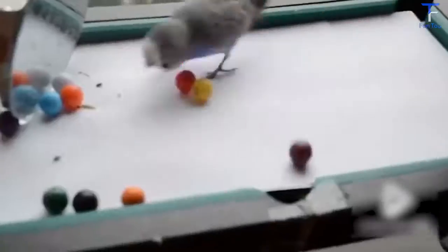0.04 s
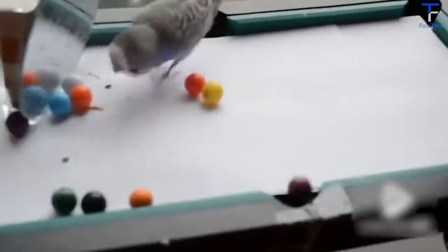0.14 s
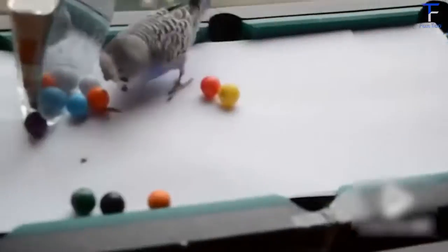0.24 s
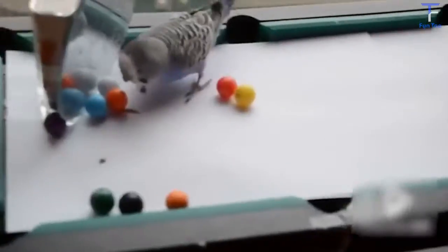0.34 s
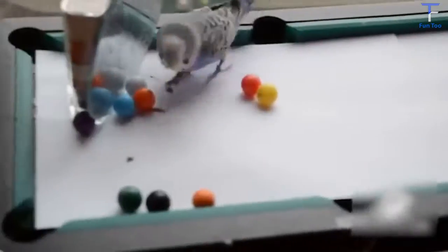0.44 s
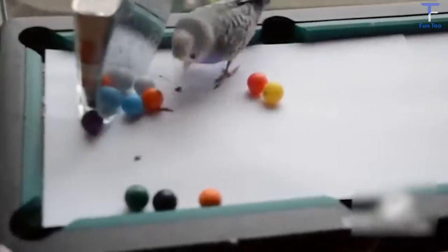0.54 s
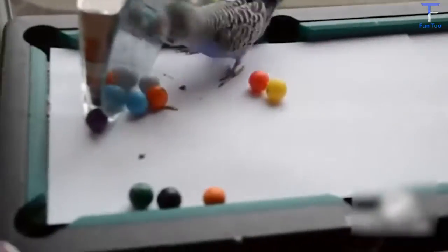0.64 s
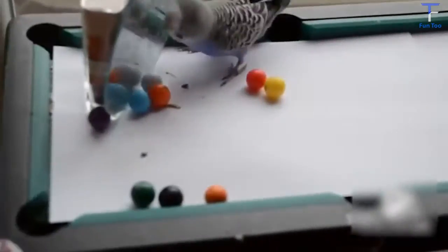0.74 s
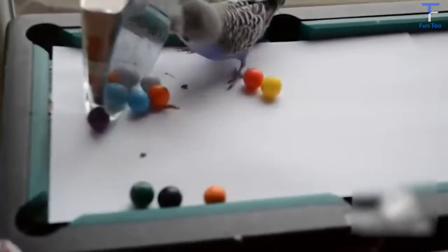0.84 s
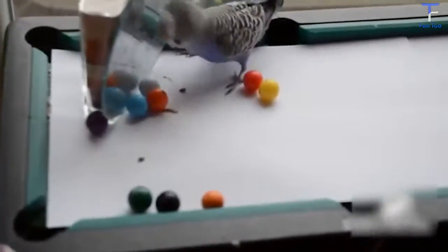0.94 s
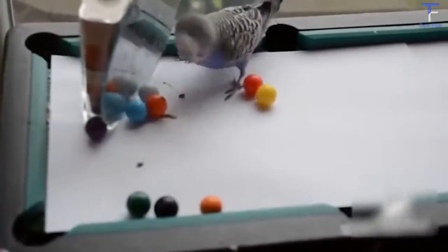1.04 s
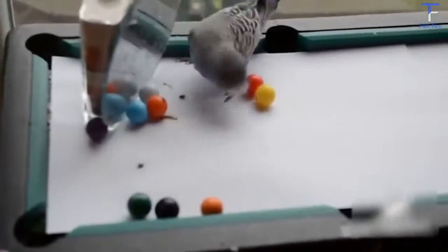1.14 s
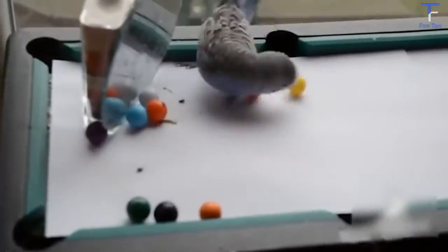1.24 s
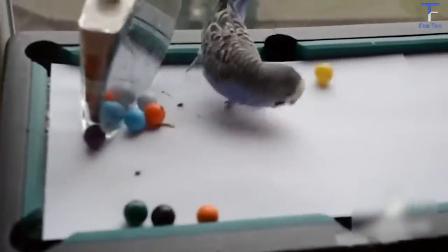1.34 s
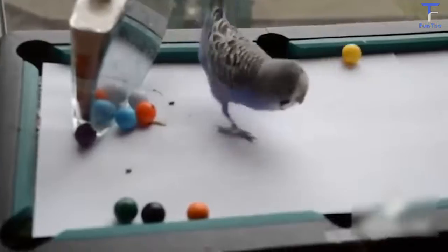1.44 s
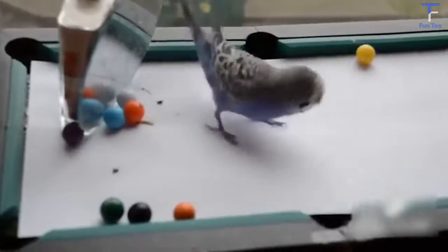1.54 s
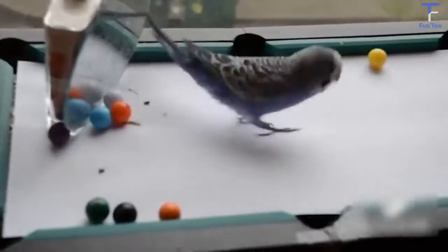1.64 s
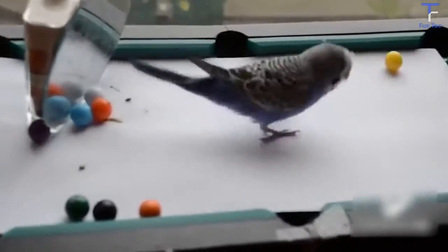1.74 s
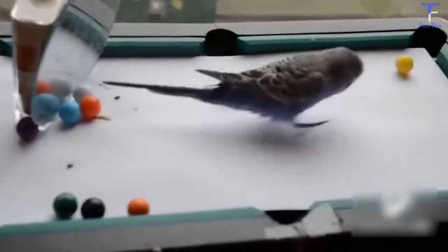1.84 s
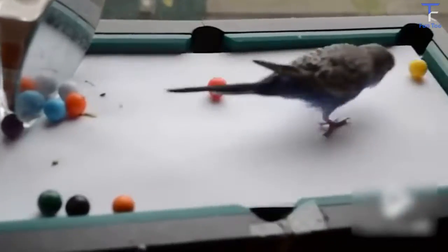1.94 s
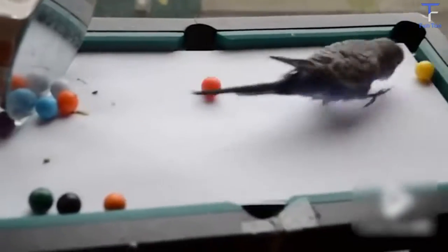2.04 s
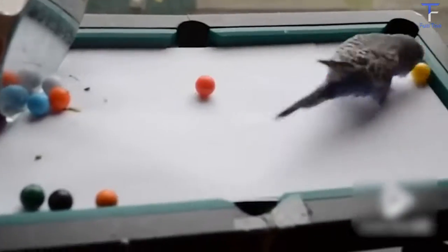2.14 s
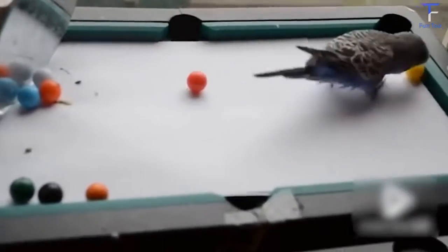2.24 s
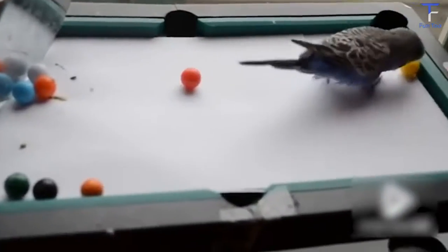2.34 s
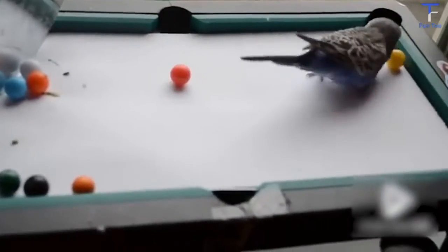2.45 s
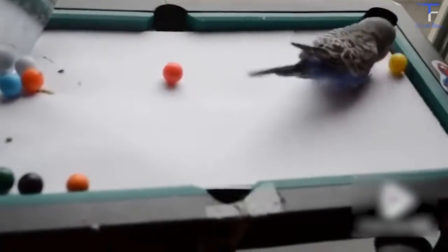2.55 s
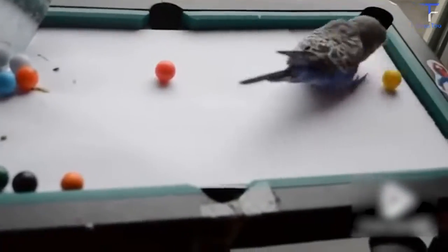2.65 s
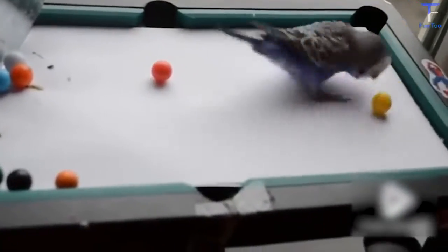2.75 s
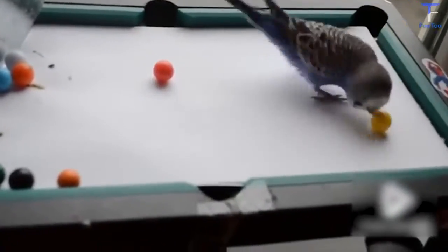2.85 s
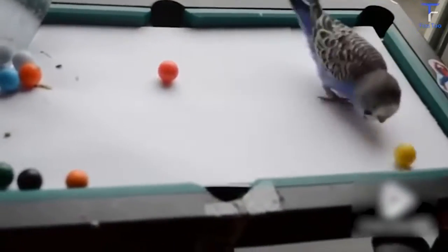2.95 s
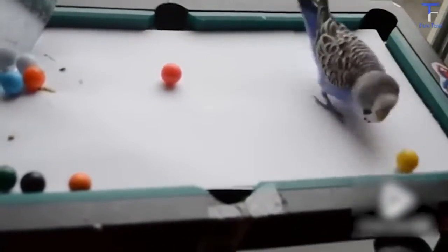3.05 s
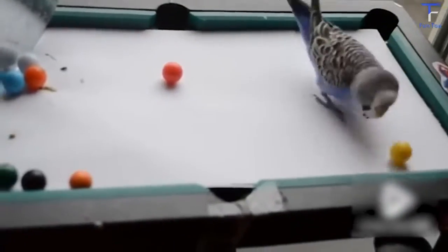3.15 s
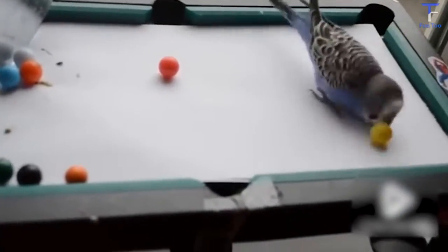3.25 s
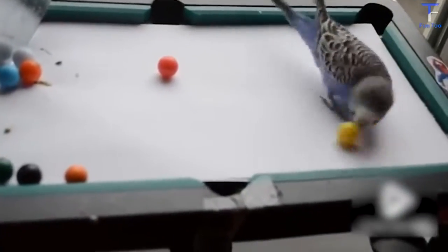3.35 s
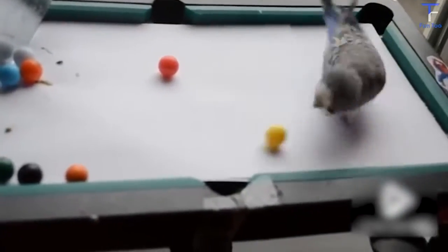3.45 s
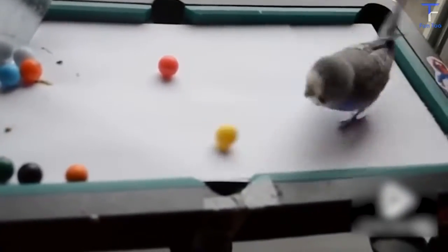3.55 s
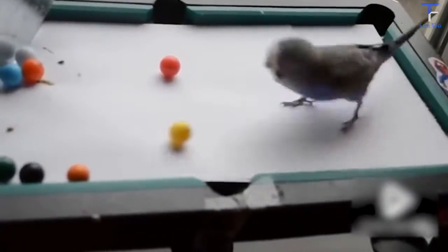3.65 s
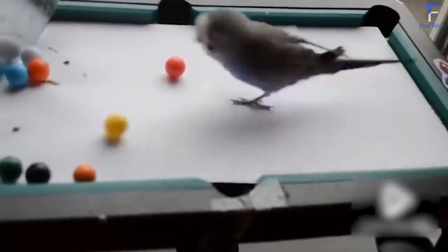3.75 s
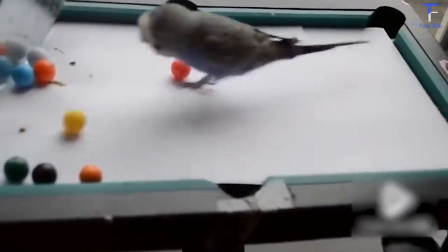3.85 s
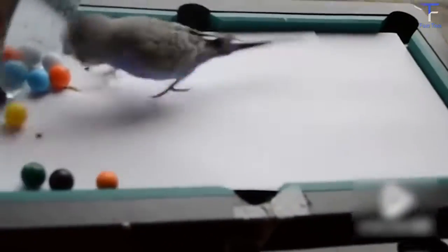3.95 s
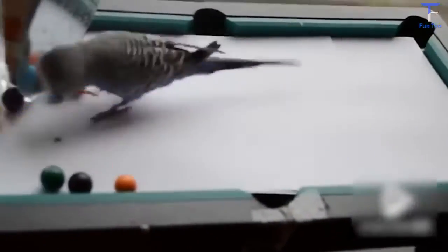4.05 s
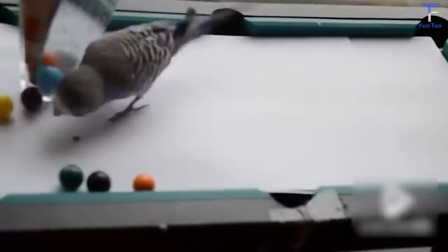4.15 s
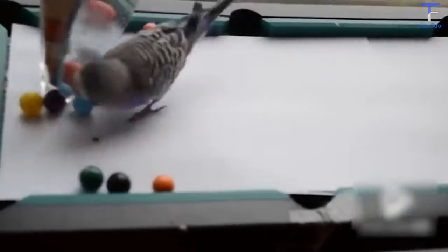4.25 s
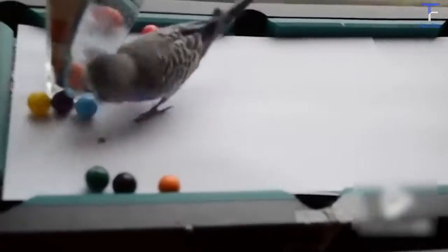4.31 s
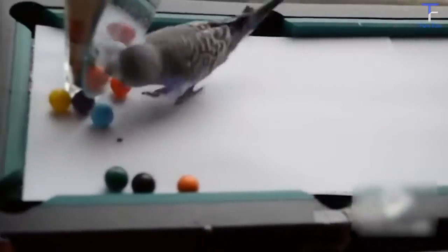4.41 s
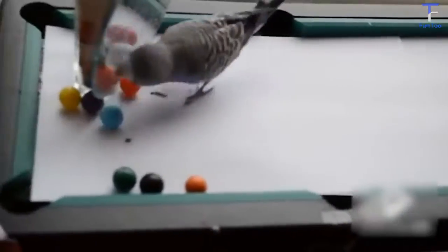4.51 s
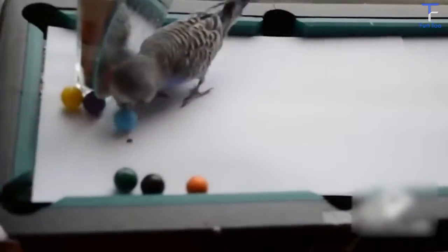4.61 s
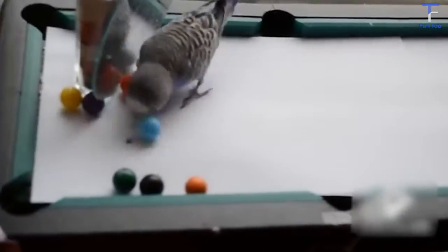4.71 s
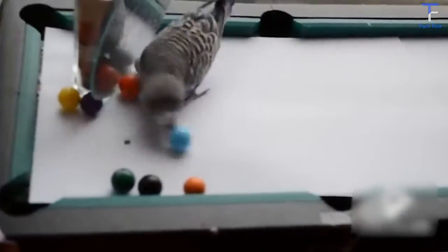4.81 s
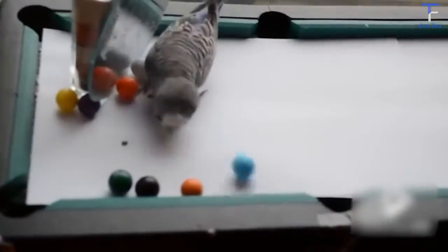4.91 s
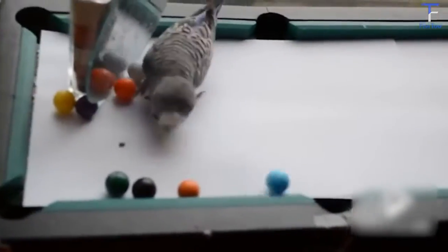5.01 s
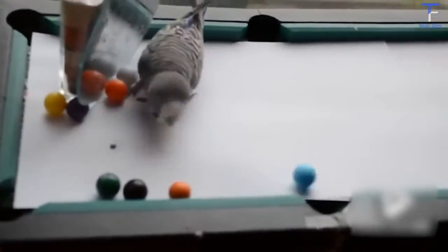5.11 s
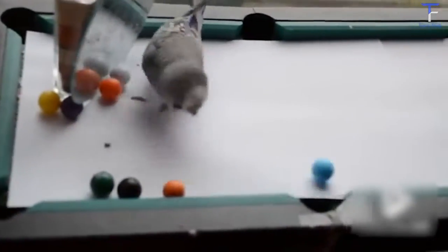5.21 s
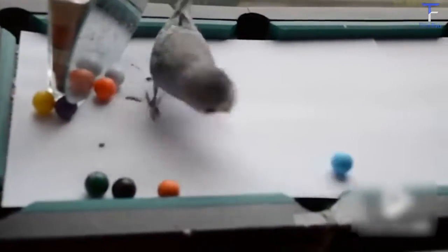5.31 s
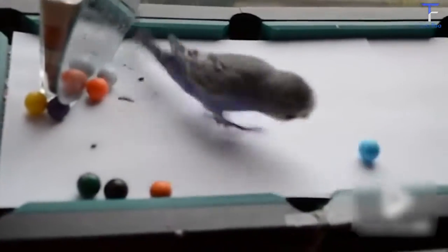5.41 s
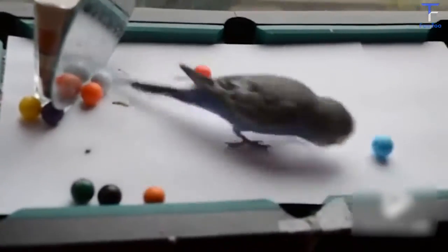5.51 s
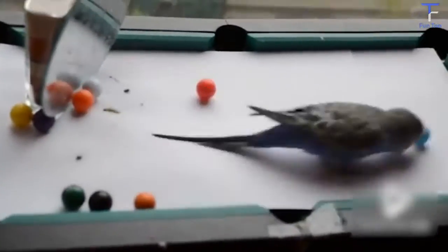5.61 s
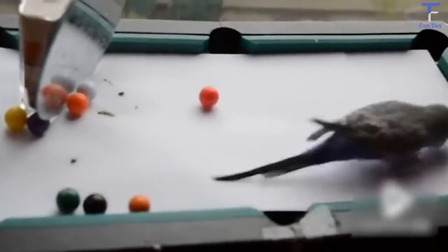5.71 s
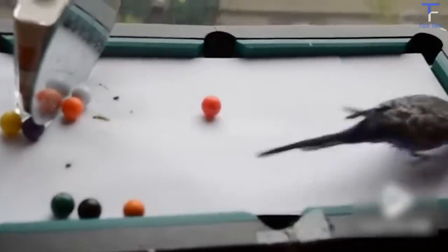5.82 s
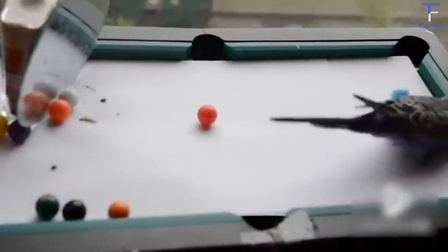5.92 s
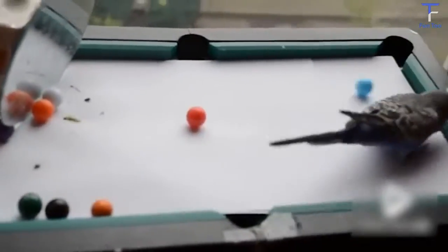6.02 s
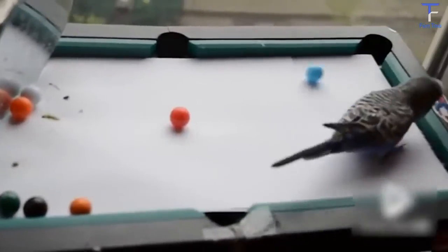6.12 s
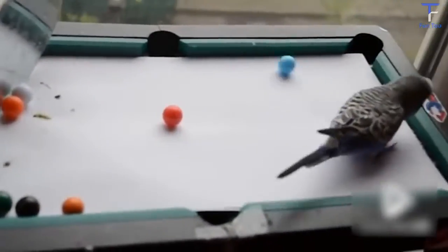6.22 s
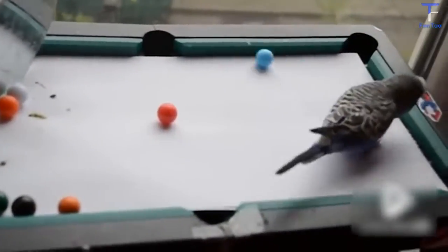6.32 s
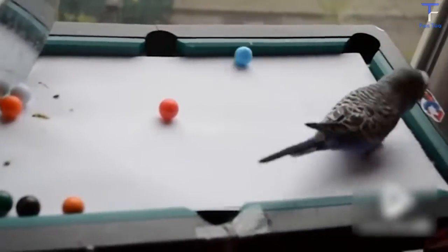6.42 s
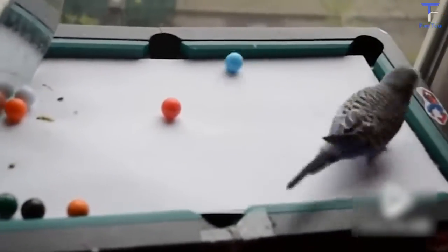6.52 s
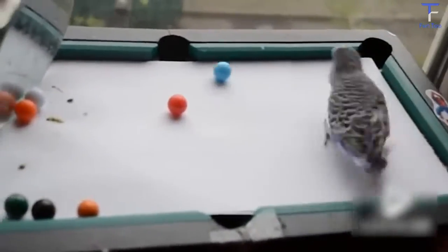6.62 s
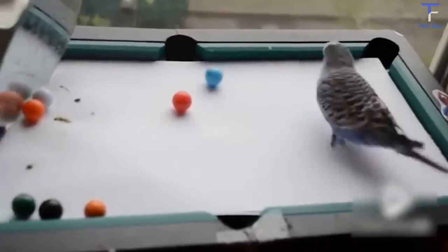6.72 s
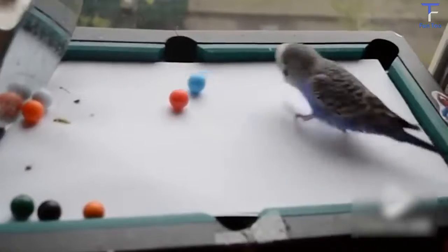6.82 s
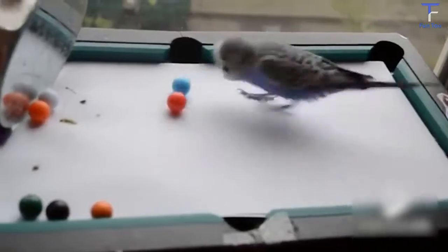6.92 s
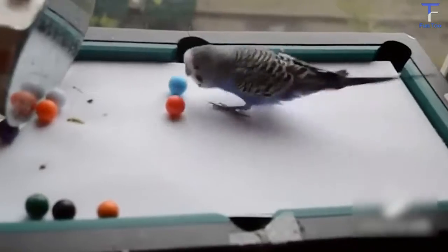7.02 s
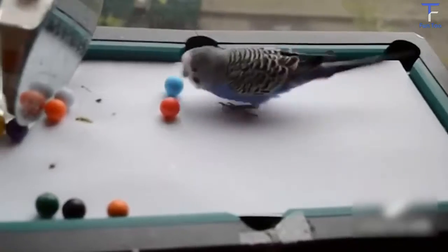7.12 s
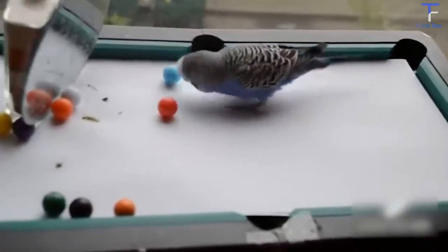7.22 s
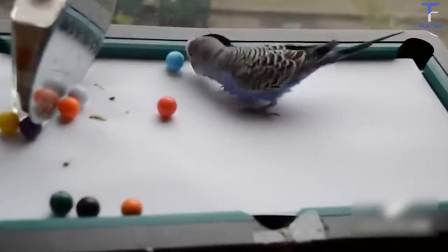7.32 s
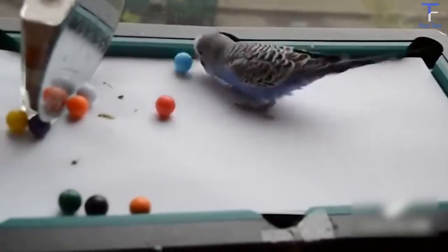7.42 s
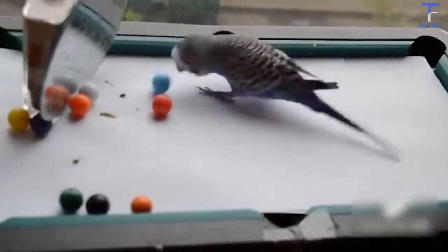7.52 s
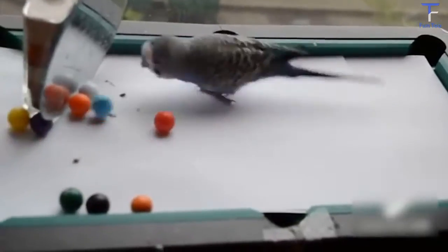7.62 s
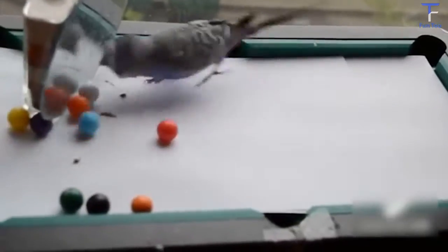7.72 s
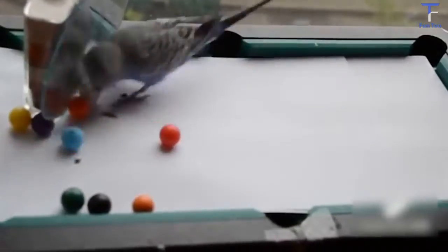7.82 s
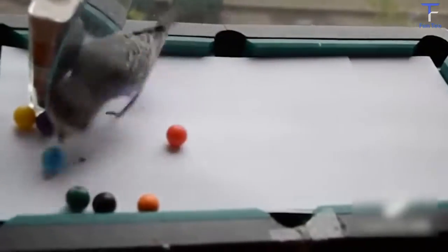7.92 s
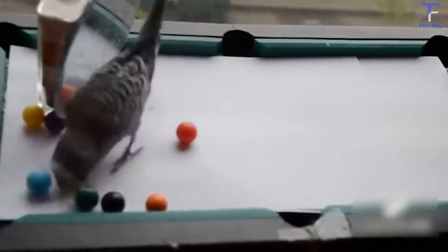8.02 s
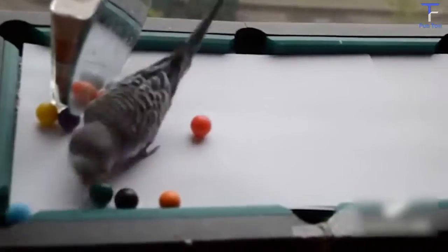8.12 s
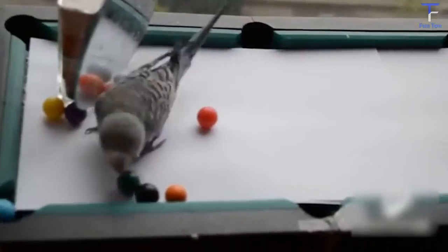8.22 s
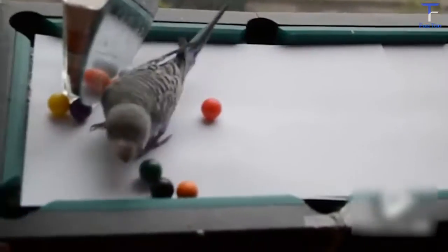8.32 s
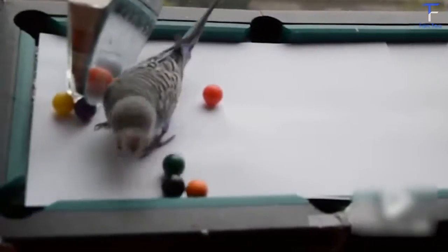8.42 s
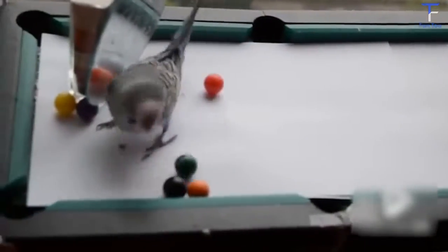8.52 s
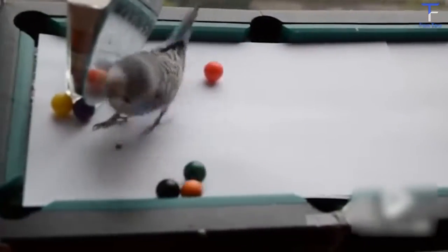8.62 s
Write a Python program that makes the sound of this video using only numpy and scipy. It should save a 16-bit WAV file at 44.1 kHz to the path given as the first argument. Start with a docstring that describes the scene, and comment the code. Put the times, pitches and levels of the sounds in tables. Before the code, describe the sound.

A close microphone in a small, quiet room picks up a budgerigar playing with small hard balls on a hollow toy pool table. Claws and beak tick lightly throughout. From 0.25 to 0.5 s balls clack sharply and chatter; faint glass clinks follow at 0.7, 0.9 and 1.06 s. After sparse taps and knocks, a loud, clear chirp at 2.3 s breaks into a short rasp, with thin whistles around it at 2.35 and 2.95 s. Footsteps patter around a knock at 3.15 s. At 4.2 s a ball knocks, then a glass clinks brightly at 4.3 s, with weaker clinks until 4.8 s. Single knocks come at 5.15, 5.9, 6.5 and 7.46 s, with faint falling whistles at 6.4 and 7.1-7.3 s. The strongest glass clink rings at 7.8 s, a soft peep follows at 7.95 s, and a tight flurry of clacks and chatter closes from 8.3 to 8.6 s.

```python
"""Small balls knock, chatter and clink in a small room, over taps, a loud chirp, a soft peep and faint whistles.
A budgerigar pushes the balls about a toy pool table; its claws and beak tap the bed.
Knocks and taps are shaped noise bursts over decaying table modes; a glass on the table rings in its own modes.
Calls are harmonics on gliding pitch curves with random roughness; all but the quiet hush feed a short reverb."""
import sys
import numpy as np
from scipy import signal
from scipy.fft import rfft, irfft, next_fast_len
from scipy.io import wavfile
from scipy.ndimage import uniform_filter1d, minimum_filter1d

SR = 44100
rng = np.random.default_rng(int(sys.argv[2]) if len(sys.argv) > 2 else 0)


def pcm_store(signal):
    """Save signal as 16-bit PCM."""
    levels = np.round(np.clip(np.atleast_2d(signal), -1, 1) * 32767)
    wavfile.write(sys.argv[1], SR, levels.astype(np.int16).T)


N = 381906
RING_TIME_S = np.arange(SR // 3) / SR  # time since a blow

# modes of the hollow table: (frequency [Hz], t60 [s], level [dB])
TABLE_MODES = [(270, .25, -3), (289, .28, -6), (322, .2, -10), (410, .15, -14), (488, .2, 0),
               (1023, .1, -4), (1095, .1, -4), (1235, .15, -1), (1293, .18, -3), (1380, .2, -6),
               (1560, .12, -6), (2889, .14, 1), (3165, .12, -4)]
# dense resonances of a plastic rail: (frequency [Hz], relative gain [dB])
RAIL_SPECTRUM = [(60, -45), (180, -21), (290, -16), (500, -1.5), (700, -3), (1100, 5.5), (2200, 4),
                 (3400, 3), (4600, -3.5), (6200, -10.5), (7900, -19.5), (9200, -7.5), (10800, -21),
                 (12000, -69)]


def amp(db):
    """Decibels to gain."""
    return 10 ** (np.asarray(db) / 20)


def unit(x):
    """Scales to rms 1."""
    return x / np.sqrt(np.mean(x ** 2) + 1e-20)


def read(points, hz):
    """Interpolates a table on a log-frequency axis."""
    f, value = np.transpose(points)
    return np.interp(np.log(hz + 1), np.log(f + 1), value)


def add(mix, s, sound):
    """Mixes a sound in at time s."""
    part = mix[max(round(s * SR), 0):][:len(sound)]
    part += sound[:len(part)]


def fade(t60_s):
    """Free exponential decay after a blow."""
    return np.exp(-np.log(1000) * RING_TIME_S / t60_s)


def colour(x, points):
    """Causal minimum-phase filter with the given spectrum in dB."""
    size = 2 * next_fast_len(len(x))
    log_gain = np.log(amp(read(points, abs(np.fft.fftfreq(size, 1 / SR)))))
    response = np.exp(np.conj(signal.hilbert(log_gain)))[:size // 2 + 1]
    return irfft(rfft(x, size) * response)[:len(x)]


def ring(modes):
    """Sum of dying modes (Hz, t60, dB), each at a random phase, set going by a brief contact."""
    contact = 1 - np.exp(-RING_TIME_S / 0.00024)
    total = np.zeros(len(RING_TIME_S))
    for hz, t60_s, db in modes:
        cycles = hz * RING_TIME_S + rng.random()
        total += amp(db) * fade(t60_s) * np.cos(2 * np.pi * cycles)
    return contact * total


def at_level(hit, db):
    """Sets the rms of a blow's first 15 ms above 1 kHz."""
    treble = signal.butter(2, 1000, "high", fs=SR, output="sos")
    head = signal.sosfilt(treble, hit[:660])
    return hit * amp(db) / np.sqrt(np.mean(head ** 2))


def clack(spectrum, t60_s, rise_s):
    """A contact that builds for a moment, then many close resonances that die together."""
    grain = rng.choice([-1., 1.], len(RING_TIME_S))
    burst = grain * fade(t60_s) * (1 - np.exp(-RING_TIME_S / rise_s))
    return at_level(colour(burst, spectrum), 0)


def weigh(hit, bass_db, treble_db):
    """A heavy blow shakes the whole table; a hard contact is bright."""
    return colour(hit, [(40, 0.033), (200, bass_db), (330, bass_db), (900, 0), (2800, 0.014), (6500, treble_db)])


def wobble(size, rate_hz):
    """Smooth random motion, rms 1, with a Gaussian roll-off around the given rate."""
    hz = np.fft.rfftfreq(size, 1 / SR)
    return unit(irfft(rfft(rng.standard_normal(size)) * np.exp(-(hz / rate_hz) ** 2), size))


def hush():
    """Steady background of the room: shaped noise."""
    hush_level_db = -56
    # spectrum of the quiet room: (frequency [Hz], relative gain [dB])
    hush_spectrum = [(15, -42.5), (25, -27), (48, -22), (257, -16.5), (293, -8.5), (498, -13.5), (649, -15),
                     (966, -11), (1070, -10.5), (1260, -14), (1730, -13), (2250, -18), (2500, -14),
                     (10200, -36), (14000, -80)]
    return amp(hush_level_db) * unit(colour(rng.standard_normal(N), hush_spectrum))


def taps(body_db=-9, trim_db=-1):
    """Claws and beak tick on the bed, which answers mostly with its low modes."""
    # a footfall has weight, a peck has little: (time [s], level before trim [dB], bass weight [dB])
    tap_rows = [(0.029, -41, 3), (0.127, -41.5, 7), (0.1916, -38.5, -15), (0.306, -36.5, 11),
                (0.6087, -42, 4), (0.7563, -39.5, 5), (0.924, -35, -17), (1.311, -54, -12),
                (1.6595, -40, 1.5), (1.8118, -45.5, -6), (1.9151, -42.5, -1), (2.025, -42.5, 3),
                (2.1273, -42.5, 3), (2.2112, -42.5, -2), (2.797, -45, -7), (2.8276, -43, 1),
                (3.0064, -48, -7), (3.0377, -42, 5), (3.1606, -44.5, 3), (3.4462, -49, -5),
                (3.481, -39.5, -4), (3.5746, -32.5, -20), (3.736, -40.5, 3.5), (3.8552, -40, 0),
                (3.936, -40, -1.5), (4.0132, -40.5, -2), (4.1107, -35, -8), (4.463, -38, -6),
                (4.6023, -43, -13), (4.694, -36, -12), (4.7094, -40.5, -20), (4.906, -48.5, -10),
                (5.378, -49.5, -10), (5.4035, -45.5, -4), (5.461, -37.5, -13), (5.585, -39, 3),
                (5.6587, -36.5, 4.5), (5.7273, -36.5, -4), (6.0303, -40.5, 5), (6.6939, -36, 0),
                (6.8538, -44, 5.5), (6.9515, -43.5, -2), (6.9998, -44.5, -15), (7.0615, -47.5, 5),
                (7.106, -39, 4.5), (7.2645, -46, 8), (7.58, -51, -8), (7.646, -42, -2),
                (7.6752, -36.5, -21), (7.924, -40, 1), (7.947, -34, -10), (8.092, -35.5, -6),
                (8.104, -36, -4)]
    # dense resonances of the bed: (frequency [Hz], relative gain [dB])
    bed_spectrum = [(60, -40), (180, -11.5), (290, 5), (500, -4), (700, -4), (1600, -5), (3200, 5.5),
                    (5200, 5.5), (6800, 1.5), (7900, -7), (9200, 4.5), (10700, -5), (12000, -50.5)]
    treble_db = -2.5
    out = np.zeros(N)
    for s, db, weight_db in tap_rows:
        snap = amp(-2) * clack(bed_spectrum, t60_s=.005, rise_s=.0004)
        thump = clack(bed_spectrum, t60_s=.034, rise_s=0.0013)
        body = colour(ring(TABLE_MODES), [(40, -15.5), (200, -2.0), (300, -0.5), (500, -3.5), (1000, -10.5)])
        hit = snap + thump + amp(body_db) * body
        add(out, s, at_level(weigh(hit, weight_db, treble_db), db + trim_db))
    return out


def panel(hz):
    """The struck patch of plastic: two heavily damped bending modes."""
    return ring([(hz, .008, 0), (1.3 * hz, .006, -3)]) * (1 - np.exp(-RING_TIME_S / .002))


def knocks(spot_db=-2):
    """Balls strike rails and each other: a short pitched clack, then the hollow table rings on."""
    # (time [s], level [dB], thud [dB], struck-spot pitch [Hz], spot strength before spot_db [dB])
    knock_rows = [(0.2559, -28.5, 13.5, 2950, 0.5), (0.3206, -16.5, 3.5, 4530, -4),
                  (0.4033, -29, 0, 2870, 1), (0.4366, -31, 9, 3000, 3), (0.4642, -16, 9.5, 1100, -4),
                  (0.477, -22, 4, 3010, 2), (0.7715, -23.5, 8, 2000, 4), (1.5016, -38, 14, 3140, -5),
                  (1.5902, -28.5, 3, 1350, -4), (2.1794, -31, -3, 2000, -13), (2.264, -22, -12, 1570, -7),
                  (2.526, -29.5, -4, 1160, -9), (2.6773, -25, -8, 1530, -4),
                  (3.149, -26.5, 1.5, 1320, -0.5), (4.2197, -21.5, -11, 2700, -3),
                  (4.2718, -37.5, 5, 1620, 6), (4.4952, -36, -6, 2550, 4.5), (5.1448, -21.5, -1, 2357, 5.5),
                  (5.9053, -22.5, -14, 1227, 0), (5.9101, -24.5, -10.5, 3050, -2.5),
                  (6.5151, -36.5, 3, 1320, -3.5), (7.4634, -29.5, -6.5, 1356, -7),
                  (8.2767, -38.5, 5.5, 1630, -9), (8.316, -33, 3, 990, -6.5), (8.3293, -30.5, 6, 3730, 5.5),
                  (8.3633, -27.5, 2, 2990, 3), (8.47, -32.5, -2, 2900, -5),
                  (8.5307, -16.5, 7.5, 6670, -4.5), (8.5395, -26.5, 12, 1040, -2),
                  (8.5645, -31, 8, 1670, -5), (8.6212, -24, 2.5, 910, -6.5)]
    # a harder knock has a shorter contact, so more treble
    brighten_db_per_db, neutral_db = 0.74, -23
    # the more a knock thuds, the less the table's modes ring
    table_ring_db, ring_loss_db_per_db = -16.5, 0.91
    # a thud also dies more slowly
    clack_t60_s, thud_doubling_db = 0.035, 23
    out = np.zeros(N)
    for s, db, thud_db, hz, pitched_db in knock_rows:
        spot = at_level(panel(hz), spot_db + pitched_db)
        body = colour(ring(TABLE_MODES), [(60, -29.5), (230, 2)])  # so small a box radiates little deep bass
        t60_s = clack_t60_s * 2 ** (thud_db / thud_doubling_db)
        body_db = table_ring_db - ring_loss_db_per_db * thud_db
        hit = clack(RAIL_SPECTRUM, t60_s, rise_s=0.0014) + spot + amp(body_db) * body
        treble_db = brighten_db_per_db * (db - neutral_db)
        add(out, s, at_level(weigh(hit, thud_db, treble_db), db))
    return out


def grains(size, per_s, spread_db):
    """Sparse clicks, most small and a few large."""
    strength = amp(spread_db * np.minimum(rng.exponential(1, size), 4))
    return strength * rng.choice([-1, 1], size) * (rng.random(size) < per_s / SR)


def scuffs():
    """Balls chatter and scrape while shoved: sparse clicks through the rail's resonances."""
    # the bird scuffles among the balls: (start [s], length [s], level [dB])
    scuff_rows = [(0.34, 0.06, -43), (0.486, .037, -30.5), (0.694, .11, -46.5), (0.792, .032, -40),
                  (4.237, 0.087, -40), (4.509, 0.083, -48), (8.321, 0.074, -36), (8.547, .06, -34.5)]
    out = np.zeros(N)
    for s, length_s, db in scuff_rows:
        size = int(length_s * SR)
        chatter = colour(grains(size, per_s=450, spread_db=3.5), RAIL_SPECTRUM)
        add(out, s, amp(db) * unit(chatter) * signal.windows.tukey(size, .4))
    return out


def call(s, hz, db, rough, partials, flutter, shimmer, shake_hz, rasp_db):
    """The syrinx glides along a pitch curve; roughness shakes its pitch and strength and adds rasp."""
    # spectrum of the rasp: (frequency [Hz], relative gain [dB])
    rasp_spectrum = [(500, -46), (1100, 4.5), (1600, -15), (2150, 3), (2800, -0.5), (3500, -7), (4700, 1),
                     (6200, -7.5), (7400, -32), (9400, -23), (11000, -80)]
    size = len(hz)
    shaken_hz = hz * (1 + flutter * rough * wobble(size, shake_hz))
    phase = 2 * np.pi * np.cumsum(shaken_hz) / SR
    tone = unit(sum(amp(level_db) * np.sin(round(k) * phase) for k, level_db in partials))
    rasp = amp(rasp_db) * rough * unit(colour(rng.standard_normal(size), rasp_spectrum))
    voice = tone * (1 + shimmer * rough * wobble(size, shake_hz)) + rasp
    out = np.zeros(N)
    add(out, s, unit(voice) * amp(db) * signal.windows.tukey(size, .06))
    return out


def whistles():
    """Each thin whistle swells and fades in one arch while it glides to its last pitch."""
    # (start [s], length [s], first pitch [Hz], last pitch [Hz], arch-top level before the mix [dB], roughness [0-1])
    whistle_rows = [(0.681, 0.041, 1050, 960, -37.5, 0.6), (2.347, .08, 4280, 5200, -30.5, .5),
                    (2.946, 0.15, 5990, 3220, -45, .8), (6.414, 0.14, 5780, 3510, -44, .9),
                    (7.087, .118, 4100, 2486, -33.5, 0.27), (7.226, .16, 5700, 3240, -43.5, 0.93)]
    glide_share, glide_sharpness, swell_db = .42, 1.7, 9.5  # share of the length, exponent, rise from the ends
    out = np.zeros(N)
    for s, length_s, first_hz, last_hz, db, rough in whistle_rows:
        u = np.linspace(0, 1, int(length_s * SR))
        hz = last_hz + (first_hz - last_hz) * np.exp(-(u / glide_share) ** glide_sharpness)
        arch_db = db + swell_db * (np.sin(np.pi * u) - 1)
        out += call(s, hz, arch_db, rough, [(1, 0), (2, -26)],
                    flutter=.11, shimmer=1.2, shake_hz=250, rasp_db=-16)
    return out


def clinks(tick_db=-8, trim_db=-1):
    """The glass rings with a mix of modes that depends on where the ball lands."""
    # balls on the glass: (time [s], level before trim [dB], spot struck [0-2])
    clink_rows = [(0.7301, -28.5, 2), (0.8975, -26.5, 2), (1.063, -29, 2), (4.3069, -9.5, 1),
                  (4.502, -29.5, 1), (4.556, -42, 1), (4.7708, -25, 1), (7.7811, -5, 0)]
    # modes of the glass: (frequency [Hz], t60 [s], level at spot 0 [dB], at spot 1 [dB], at spot 2 [dB])
    glass_modes = [(1307, .33, -17.5, -19, -45), (1378, .26, -35, -30, -20), (2258, .14, -27, -22, -19),
                   (2385, .11, -18, -3, -22), (2552, .12, -22, -17, -24), (3036, .05, -11, -8, -30),
                   (3321, .12, -30, -30, -17), (3629, .16, -22, -18, -35), (4388, .042, 0, -8, -30),
                   (5138, .04, -7, 0, 0), (5200, .055, -5, -3, -14), (5590, .03, -12, -21, -10),
                   (6060, .035, -11, -11, -24), (6895, .06, -12, -8, -30), (7310, .03, -28, -28, -14),
                   (8025, .04, -21, -33, -35), (8850, .04, -11, -11, -20), (9500, .035, -15, -18, -10),
                   (10100, .02, -19, -27, -30)]
    tick_spectrum = [(100, -18.5), (700, -4.0), (2800, 9.5), (9500, -4), (11000, -15), (13000, -59.0)]
    out = np.zeros(N)
    for s, db, spot in clink_rows:
        glass = ring([(hz, t60_s, spots_db[int(spot)]) for hz, t60_s, *spots_db in glass_modes])
        tick = clack(tick_spectrum, t60_s=0.013, rise_s=.0002)
        add(out, s, at_level(at_level(glass, 0) + amp(tick_db) * tick, db + trim_db))
    return out


def follow(rows):
    """Time, pitch and level of a call, sample by sample."""
    s, hz, db = np.transpose(rows)
    t = np.arange(s[0], s[-1], 1 / SR)
    return t, np.interp(t, s, hz), np.interp(t, s, db)


def chirp():
    """A loud clear note that breaks into a rasp as it fades."""
    # (time [s], pitch [Hz], level [dB])
    chirp_rows = [(2.305, 1000, -35), (2.31, 1070, -13), (2.319, 1140, -11), (2.339, 1045, -11.5),
                  (2.358, 1005, -10.5), (2.379, 995, -16), (2.386, 1000, -24), (2.411, 1010, -25),
                  (2.436, 970, -43)]
    # partials: (multiple of the pitch, relative level [dB])
    voice_partials = [(1, -14.5), (2, 9), (3, -15), (4, -5.5), (5, -29.5), (6, -28), (8, -38)]
    clear_rough, break_s, break_length_s = .25, 2.384, .008
    t, hz, db = follow(chirp_rows)
    broken = (1 + np.tanh((t - break_s) / break_length_s)) / 2
    rough = clear_rough + (1 - clear_rough) * broken
    return call(t[0], hz, db, rough, voice_partials, flutter=.075, shimmer=.3, shake_hz=700, rasp_db=-4)


def peep(octave_db=-18):
    """A short, soft, nearly pure note with a weak octave."""
    # (time [s], pitch [Hz], level [dB])
    peep_rows = [(7.955, 1596, -28), (7.971, 1407, -30), (7.987, 1496, -42), (7.993, 1418, -42),
                 (8.015, 1440, -34), (8.026, 1435, -43)]
    t, hz, db = follow(peep_rows)
    return call(t[0], hz, db, .1, [(1, 0), (2, octave_db)], flutter=.11, shimmer=1.2, shake_hz=250, rasp_db=-16)


def near_echo(x, delay_s=0.0062, echo_db=-11):
    """One early reflection from a surface beside the table."""
    out = np.zeros(N)
    add(out, delay_s, amp(echo_db) * x)
    return out


def room(x):
    """Dense reflections that build up after a few milliseconds and die band by band."""
    # the room's decay: (frequency [Hz], t60 [s])
    room_decay = [(200, 0.28), (600, 0.24), (1400, 0.29), (3500, 0.35), (6000, 0.4), (10000, 0.46)]
    t = np.arange(SR // 2) / SR
    echoes = rng.standard_normal(len(t)) * np.clip((t - .004) / 0.014, 0, 1)
    hz, when_s, z = signal.stft(echoes, SR, nperseg=256)
    decay = np.exp(-np.log(1000) * when_s / read(room_decay, hz)[:, None])
    tail = signal.istft(z * decay, SR, nperseg=256)[1]
    tail /= np.linalg.norm(tail)
    tail = colour(tail, [(200, 5.5), (1000, 3), (3000, -0.5), (6000, -4.5), (10000, -8.5)])
    return signal.fftconvolve(x, tail)[:N]


def scene():
    """Sources reach the microphone directly and by way of the room; whistles carry the most reflected sound."""
    feet, balls = taps(), knocks() + scuffs()
    thin = amp(-5) * whistles()
    glass = clinks()
    notes = chirp() + peep()
    # the high modes beam toward the microphone
    glass_sent = colour(glass, [(1300, -7), (3000, -6), (5000, -12), (10000, -7.5)])
    direct = balls + near_echo(balls) + feet + glass
    sent = amp(-6.0) * balls + amp(-6.0) * feet + glass_sent
    calls = notes + thin + room(amp(-16) * notes + thin)
    return (direct + room(sent) + calls + hush())[None]


def record(dry):
    """The microphone loses top treble; a fast limiter, lopsided overload and band limit follow."""
    limit, window_samples = 1.25, 60
    lopsided = .035  # upward push on full-scale peaks of either sign
    edge_hz = 16000
    heard = colour(dry[0], [(20, -8), (70, 0), (10800, 0), (12000, -16), (16000, -24)])
    gain = 1 / np.maximum(abs(heard) / limit, 1)
    held = minimum_filter1d(gain, size=window_samples)
    limited = heard * uniform_filter1d(held, size=window_samples)
    clipped = np.clip(limited, -.97, .97)
    bent = clipped + lopsided * clipped ** 4
    low_pass = signal.firwin(255, edge_hz, window=("kaiser", 9), fs=SR)
    return signal.oaconvolve(bent, low_pass, "same")[None]


dry = scene()
out = record(dry)
pcm_store(out)
```